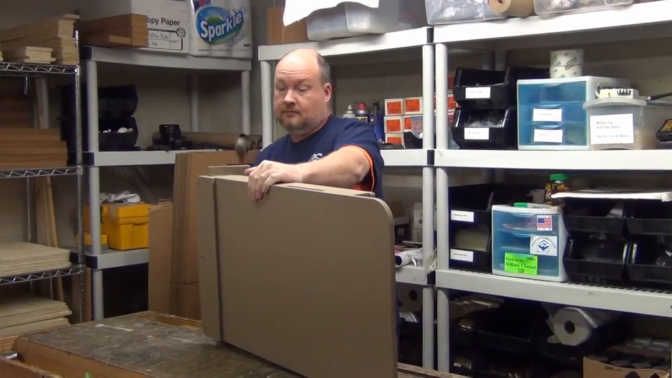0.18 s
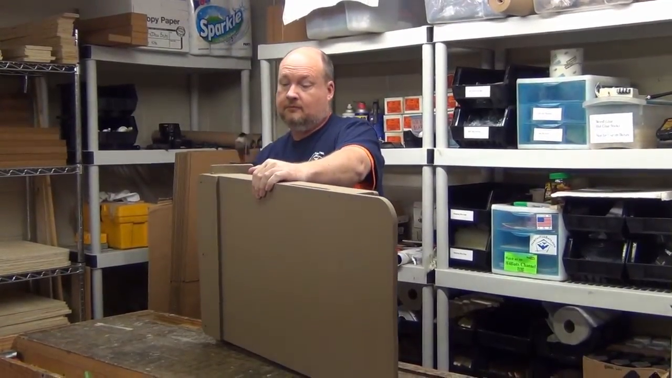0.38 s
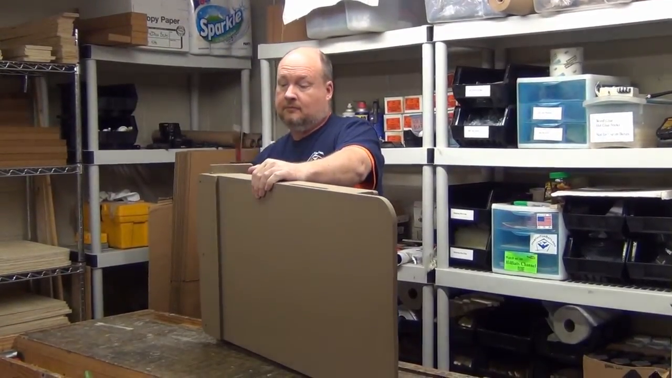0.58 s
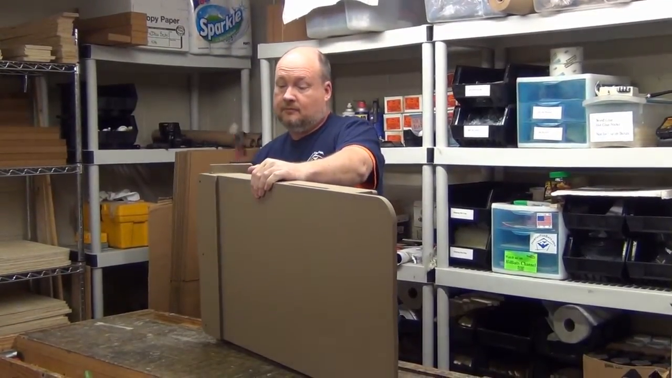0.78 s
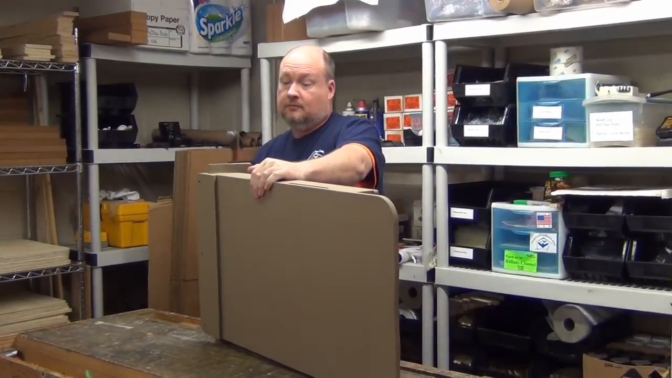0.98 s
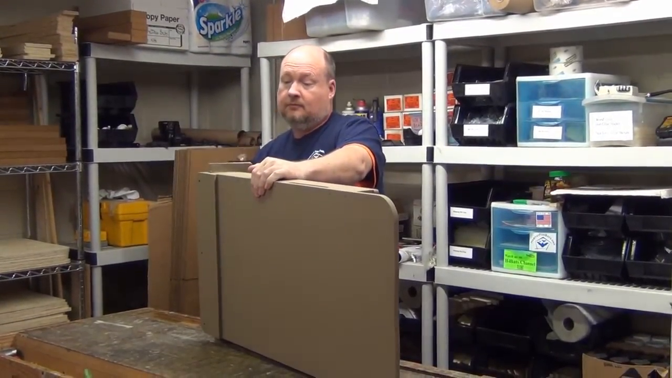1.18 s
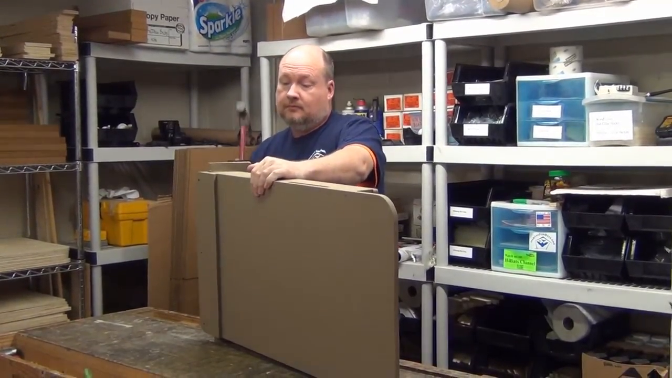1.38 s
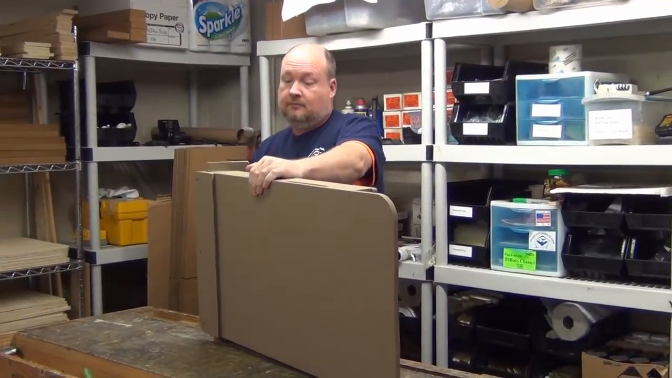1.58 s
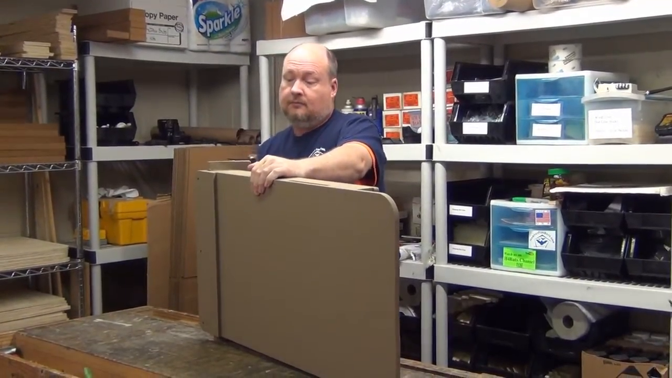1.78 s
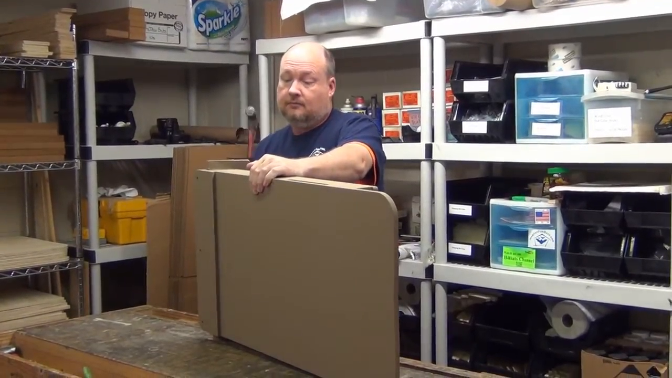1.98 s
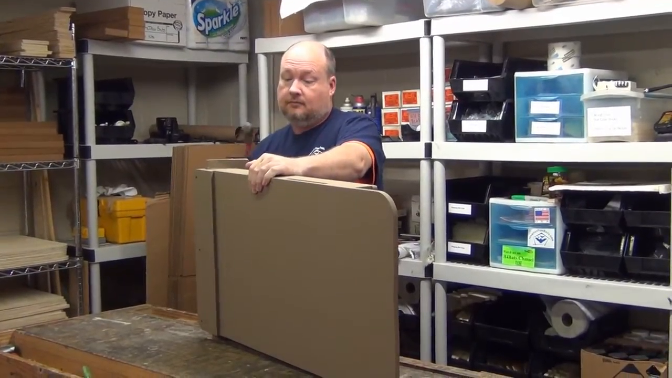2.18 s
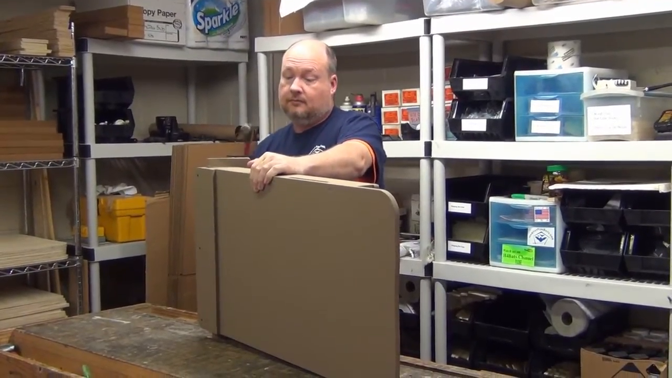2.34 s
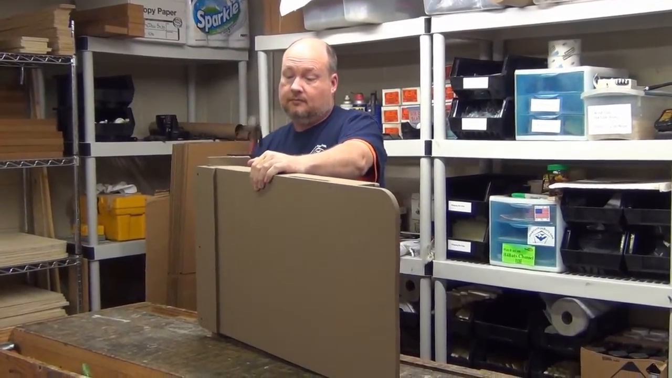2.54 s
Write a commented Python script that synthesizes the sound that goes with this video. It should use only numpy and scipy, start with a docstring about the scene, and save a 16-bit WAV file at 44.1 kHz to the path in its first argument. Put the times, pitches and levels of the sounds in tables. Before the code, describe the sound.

Four loud hollow thuds of a wooden box panel knocked on a workbench in a small workshop

```python
"""Wooden panel struck in a small workshop

A hollow panel is struck four times: noise echoes, dying sines and a short noise crack make each blow.
Soft rebounds of noise and wood tones follow, and loose things tick as tiny snaps of bright noise.
Behind them lie patchy room hiss, fuzzy machine hums and the camera's own faint whines.
The sound reaches two microphone ports, and the camera's limiter flattens each thud."""
import sys
import numpy as np
from scipy import signal
from scipy.fft import rfft, irfft
from scipy.io import wavfile
from scipy.ndimage import uniform_filter1d, minimum_filter1d

SR = 44100
rng = np.random.default_rng(int(sys.argv[2]) if len(sys.argv) > 2 else 0)


def master_out(mix):
    """Clip the mix to full scale and print it as 16-bit PCM to the path in sys.argv[1]."""
    frames = np.transpose(np.atleast_2d(mix))
    ceiling = np.clip(frames, -1, 1)
    pcm = np.round(ceiling * 32767).astype(np.int16)
    wavfile.write(sys.argv[1], SR, pcm)


def voltage_ratio(decibels):
    """Convert decibels (scalar or array-like) to amplitude ratios, 20 dB per decade."""
    exponent = np.asarray(decibels, float) / 20
    return 10 ** exponent


N = 112455

# Likeness of the two microphone ports: (frequency [Hz], correlation [-1 to 1])
PORT_LIKENESS = [(30, 0.42), (60, 1), (150, 0.92), (380, 0.97), (950, 0.98), (2380, 0.99), (5980, 0.89),
                 (15000, .85)]
# Balance of the two ports: (frequency [Hz], left minus right [dB])
PORT_BALANCE = [(30, 4), (70, -3), (180, -7.7), (550, -0.8), (1650, -1.6), (4970, -1), (15000, 0.3)]

# Colour of the room hiss: (frequency [Hz], relative level per Hz [dB])
HISS_COLOUR = [(25, -36), (45, -17), (65, 5), (100, 0), (176, 4.5), (357, -1.5), (783, -8), (1180, -5.5),
               (2510, -12.5), (4690, -14), (6150, -14), (7850, -11), (10000, -18), (14300, -24),
               (16300, -34)]
# Level of the room hiss before patchiness: (time [s], level [dB])
HISS_LEVEL = [(0, -58.5), (.2, -54.5), (.7, -58.5), (1.4, -57), (2.1, -57.5), (2.55, -52)]
# Fuzzy machine tones: (frequency [Hz], width [Hz], level [dB])
MACHINE_HUMS = [(171.7, 7.2, -64), (244, 7.4, -65), (306, 24, -68), (358.7, 26, -62), (500, 4.7, -70),
                (904, 23, -69.5), (1048, 16, -73)]
# Camera motor: (time [s], fundamental [Hz], pulse level before the harmonic levels [dB])
MOTOR_WHINE = [(1.22, 1590, -85), (1.28, 1587, -61), (1.55, 1585, -61), (1.9, 1553, -62), (2.15, 1553, -62),
               (2.55, 1560, -63)]
# Harmonics of the motor: (multiple of the fundamental [-], relative level [dB])
MOTOR_HARMONICS = [(1, -9), (2, -1.5), (3, 0)]

# Small ticks of loose things: (time [s], relative level [dB], centre frequency [Hz])
TICKS = [(0.0034, -33.5, 8000), (0.0458, -37, 7400), (0.1012, -40, 9250), (0.5364, -38, 8150),
         (0.576, -34, 8220), (1.86, -42, 7680), (1.882, -32.5, 9300), (1.925, -37, 7660),
         (1.939, -32.5, 7800), (2.0168, -37.5, 8400), (2.0414, -58, 8060), (2.0547, -50, 8180),
         (2.098, -50, 8240), (2.497, -24, 8170), (2.503, -24, 8460), (2.514, -28.5, 8150)]
# Soft rebounds: (time [s], relative level [dB], rise [s], brightness [dB per octave])
REBOUNDS = [(.511, -39, 0.011, -0.45), (0.822, -55, .004, 1.5), (1.075, -42, 0.0022, -1.5),
            (1.184, -38, 0.0066, 0.5), (1.35, -61.5, 0.0024, -0.5), (1.823, -42, 0.0063, 0),
            (1.995, -57, 0.0021, -2.5), (2.436, -45.5, 0.0082, 0.2)]
# Colour of the rebound scuff: (frequency [Hz], relative level per Hz [dB])
SCUFF_COLOUR = [(240, -22), (400, -6), (841, -8), (1210, -15), (1520, -9.5), (1970, -19), (2150, -25),
                (2580, -23.5), (5190, -21.5), (8060, -6), (15000, -54)]
# Higher wood tones: (frequency [Hz], relative level [dB], 60 dB decay before scaling [s])
WOOD_TONES = [(910, -6, .08), (1040, 3, .15), (1264, -9, .12), (1530, -5, .24), (1810, -6, .2),
              (2160, -7, .26), (2480, -9, .08), (2860, -9, .1), (3620, -12, .12)]

# Blows: (time [s], level before the limiter [dB], boom of the modes [dB],
#         boom tilt [dB per octave], brightness [dB per octave], decay factor [-])
BLOWS = [(0.2262, 7, -4.1, 1.2, -1.33, 1.12), (0.8951, 6, -2.6, -0.2, -0.95, 1.102),
         (1.5439, 6, -3.5, 0.5, 0.45, 1.022), (2.167, 5.5, -9.5, 1, -0.86, 1.033)]
# Modes of panel and bench: (frequency [Hz], relative level [dB], 60 dB decay before scaling [s])
BODY_MODES = [(104.44, -13.5, 0.252), (122.2, -5, 0.29), (141, -7, 0.29), (164.5, 1.43, 0.31),
              (206.6, -1, 0.32), (245.8, -6, 0.32), (267.6, 6, 0.22), (298.2, -4.5, 0.31),
              (331.6, -4.5, 0.25), (391, -0.5, .24), (428.6, -13, 0.26), (473, -18.5, 0.36),
              (530, -12, 0.26), (652.6, -10, 0.21)]
# Colour of the dense echoes: (frequency [Hz], relative level per Hz [dB])
THUD_COLOUR = [(24, -69), (40, -29), (140, 0.5), (269, -1), (503, -14), (680, -10), (770, -11),
               (1020, -14.5), (2260, -23.5), (5050, -29), (7930, -20.5), (13800, -51.5), (16000, -63)]
# Decay of the echoes: (frequency [Hz], 60 dB decay before scaling [s])
THUD_DECAY = [(60, 0.36), (150, 0.21), (400, 0.3), (1000, 0.25), (3000, 0.31), (8000, 0.28), (14000, 0.23)]
# Swell of the echoes: (frequency [Hz], rise time constant [s])
THUD_RISE = [(60, 0.076), (200, 0.0067), (500, 0.011), (1500, 0.001), (10000, 0.00067)]
# Echoes thinned where the modes carry the boom: (frequency [Hz], gain [dB])
ECHO_THINNING = [(90, 0), (140, -6), (350, -6), (520, 0)]
# Colour of the contact crack: (frequency [Hz], relative level per Hz [dB])
CRACK_COLOUR = [(150, -7), (400, -9.5), (900, 5), (1500, -8), (2500, -6), (4700, -22), (8200, -9.5),
                (10500, -17.5), (12700, -32), (16000, -37)]

PATCH_DB = -2  # spread of the hiss patches
LINE_HZ, LINE_DB = 15735, -71  # thin steady line-scan tone
WHINE_FIRST_S, WHINE_PER_S, WHINE_PULSE_S, WHINE_UNEVEN_DB = 1.289, 30, 0.0042, 2
TICK_DB, TICK_T60, TICK_WIDTH_HZ = -4, 0.009, 2500
TICK_TAIL_DB, TICK_TAIL_T60 = -21, 0.33
REBOUND_T60, REBOUND_RING_DB, SNAP_DB = 0.26, -4.5, 2.5
NOTE_DELAY_S, NOTE_HZ, NOTE_DB = 0.03, 850, 1.5  # late note, level relative to the wood tones
EARLY_S, EARLY_DB = 0.0058, -34  # lead of the thump through bench and floor over the air sound
ECHO_DB, BODY_DB, TONES_DB = -1.5, 1.5, -21.5
BODY_RISE_S, BODY_SPREAD_DB, TONE_SPREAD_DB = 0.0085, 2, 2
CRACK_DB, CRACK_T60, CRACK_RISE_S = 1.5, 0.014, 0.0015
CLUMP_DB, CLUMP_S = 0.5, 0.0037  # the echoes come in clumps
LATE_DB, LATE_T60 = -61.5, 0.73  # the slow end of the room
LIMIT_DB, RATIO, RECOVER_DB_PER_S, HOLD_S = -6, 11.6, 479, 0.007
EDGE_HZ = 16400  # upper edge of the recorded band


def evened(x):
    """Scale the whole array to an rms of 1."""
    return x / np.sqrt(np.mean(x ** 2) + 1e-20)


def read(points, hz):
    """Read a table of values along a logarithmic frequency axis."""
    f, value = np.transpose(points)
    return np.interp(np.log(hz + 1), np.log(f + 1), value)


def add(mix, s, sound):
    """Lay a sound into the mix at time s, cut at the end."""
    part = mix[:, round(s * SR):][:, :sound.shape[-1]]
    part += sound[..., :part.shape[1]]


def pair_noise(size, colour, tilt_db=0.):
    """Coloured noise at two microphone ports, partly alike in each band, rms 1."""
    hz = np.fft.rfftfreq(size, 1 / SR)
    common, apart = rfft(rng.standard_normal((2, size)))
    side = np.sqrt((1 - np.clip(read(PORT_LIKENESS, hz), 0, 1)) / 2)
    mid = np.sqrt(1 - side ** 2)
    lean = voltage_ratio(read(PORT_BALANCE, hz) / 2)
    left = (mid * common + side * apart) * lean
    right = (mid * common - side * apart) / lean
    tilt = tilt_db * np.log2((hz + 20) / 1000)
    return evened(irfft(np.array([left, right]) * voltage_ratio(read(colour, hz) + tilt), size))


def ring(modes, t, spread_db, slow, tilt_db=0):
    """Dying sines, struck a little differently each time and heard a little differently at each port."""
    hz, db, t60 = np.transpose(modes)[:, :, None]
    chance = rng.standard_normal((3, len(modes), 1))
    level_db = db + tilt_db * np.log2(hz / 230) + spread_db * chance[0]
    total = np.sqrt((voltage_ratio(db) ** 2).sum() / 2)
    size = voltage_ratio(level_db - 60 * t / (slow * t60)) / total
    turn = 2 * np.pi * hz * t + 0.88 * chance[1]
    ports = []
    for port in (1, -1):
        heard = (size * np.sin(turn + port * 0.072 * chance[2])).sum(0)
        ports.append(heard * voltage_ratio(-0.45 * port))
    return np.array(ports)


def fuzzy_tone(hz, width_hz, db):
    """A machine hum as noise in one narrow resonance, the same at both ports."""
    f = np.fft.rfftfreq(N, 1 / SR)
    resonance = 1 / (1 + ((f - hz) / width_hz * 2) ** 2)
    return voltage_ratio(db) * evened(irfft(rfft(rng.standard_normal(N)) * resonance, N))


def hiss():
    """Room hiss, slightly patchy in time and pitch, with fuzzy hums and one thin high tone."""
    t = np.arange(N) / SR
    _, _, z = signal.stft(pair_noise(N, HISS_COLOUR), nperseg=512)
    patches = uniform_filter1d(rng.standard_normal(z.shape[1:]), 6, 0)  # across frequency
    patches = evened(uniform_filter1d(patches, 10, 1))  # across time
    noise = signal.istft(z * voltage_ratio(PATCH_DB * patches), nperseg=512)[1][:, :N]
    hums = sum(fuzzy_tone(*row) for row in MACHINE_HUMS)
    line = voltage_ratio(LINE_DB) * np.sin(2 * np.pi * LINE_HZ * t)
    return noise * voltage_ratio(np.interp(t, *np.transpose(HISS_LEVEL))) + hums + line


def whine():
    """A faint small motor in the camera: gliding harmonics, pulsing once a picture."""
    t = np.arange(N) / SR
    s, hz, db = np.transpose(MOTOR_WHINE)
    turn = 2 * np.pi * np.cumsum(np.interp(t, s, hz)) / SR
    off = ((t - WHINE_FIRST_S) * WHINE_PER_S + 0.5) % 1 - 0.5  # pictures from the nearest pulse
    pulse = np.exp(-0.5 * (off / WHINE_PER_S / WHINE_PULSE_S) ** 2)
    uneven = WHINE_UNEVEN_DB * evened(uniform_filter1d(rng.standard_normal(N), 400))
    tone = sum(voltage_ratio(d) * np.sin(k * turn) for k, d in MOTOR_HARMONICS)
    return voltage_ratio(np.interp(t, s, db) + uneven) * pulse * tone


def tick(db, hz):
    """A tiny snap of bright noise with a little room behind it."""
    t = np.arange(SR // 4) / SR
    colour = [(1000, -50), (hz - TICK_WIDTH_HZ, -22), (hz, 0), (hz + TICK_WIDTH_HZ, -8), (16000, -30)]
    snap = np.minimum(t / 0.00046, 1) * voltage_ratio(-60 * t / TICK_T60)
    room = np.minimum(t / 0.0026, 1) * voltage_ratio(TICK_TAIL_DB - 60 * t / TICK_TAIL_T60)
    return voltage_ratio(db + TICK_DB) * pair_noise(len(t), colour) * (snap + room)


def rebound(db, rise_s, tilt_db):
    """A soft scuff of noise with the wood tones and one late dying note."""
    t = np.arange(SR // 2) / SR
    late = np.maximum(t - NOTE_DELAY_S, 0)
    note = voltage_ratio(NOTE_DB - 60 * late / 0.13) * np.minimum(late / 0.017, 1)
    note = note * np.sin(2 * np.pi * NOTE_HZ * late)
    decay = voltage_ratio(-60 * t / REBOUND_T60) + voltage_ratio(SNAP_DB - 60 * t / 0.02)  # scuff and short snap
    scuff = decay * pair_noise(len(t), SCUFF_COLOUR, tilt_db)
    # the brighter the scuff, the weaker the wood
    wood = voltage_ratio(REBOUND_RING_DB - 2.3 * tilt_db) * (ring(WOOD_TONES, t, TONE_SPREAD_DB, 0.71) + note)
    return voltage_ratio(db) * np.minimum(t / rise_s, 1) * (scuff + wood)


def early_thump(db):
    """The panel's modes through bench and floor, faint, swelling until the blow arrives."""
    t = np.arange(round(2 * EARLY_S * SR)) / SR
    swell = np.sin(np.pi * t / (2 * EARLY_S))
    return voltage_ratio(db + EARLY_DB) * swell * ring(BODY_MODES, t, 7.5, 1)


def room_echoes(t, tilt_db, slow):
    """Dense echoes as noise that rises and dies octave by octave, in clumps, with a slow room tail."""
    size = len(t)
    hz = np.fft.rfftfreq(size, 1 / SR)
    z = rfft(pair_noise(size, THUD_COLOUR, tilt_db)) * voltage_ratio(read(ECHO_THINNING, hz))
    octave = np.clip(np.log2(np.maximum(hz, 1) / 40), 0, 9)
    clumps = uniform_filter1d(rng.standard_normal((4, size)), round(CLUMP_S * SR), axis=1)
    clumps = evened(clumps)
    late = np.minimum(t / 0.036, 1) * voltage_ratio(LATE_DB - 60 * t / LATE_T60)
    thud = 0
    for k in range(10):
        share = np.clip(1 - abs(octave - k), 0, 1)  # overlapping octave bands
        centre = 40 * 2. ** k
        rise = (1 - np.exp(-t / read(THUD_RISE, centre))) ** 2
        shape = rise * voltage_ratio(-60 * t / (slow * read(THUD_DECAY, centre)))
        shape = shape * voltage_ratio(CLUMP_DB * clumps[k // 3])  # neighbouring bands share their clumps
        thud = thud + (shape + late) * irfft(z * share, size)
    return thud


def blow(db, boom_db, low_db, tilt_db, slow):
    """A blow on the panel: contact crack, ringing modes, higher wood tones and dense room echoes."""
    t = np.arange(SR) / SR
    thud = voltage_ratio(ECHO_DB) * room_echoes(t, tilt_db, slow)
    crack = voltage_ratio(CRACK_DB - 60 * t / CRACK_T60) * np.minimum(t / CRACK_RISE_S, 1)
    crack = crack * pair_noise(len(t), CRACK_COLOUR)
    body = voltage_ratio(BODY_DB + boom_db) * (1 - np.exp(-t / BODY_RISE_S)) ** 2
    body = body * ring(BODY_MODES, t, BODY_SPREAD_DB, slow, low_db)
    tones = voltage_ratio(TONES_DB) * np.minimum(t / 0.00067, 1) * ring(WOOD_TONES, t, TONE_SPREAD_DB, slow)
    return voltage_ratio(db) * (thud + crack + body + tones)


def scene():
    """The workshop at the two microphone ports, background first."""
    mix = hiss() + whine()
    for source, rows in ((tick, TICKS), (rebound, REBOUNDS), (blow, BLOWS)):
        for s, *row in rows:
            add(mix, s, source(*row))
    for s, db, *_ in BLOWS:
        add(mix, s - EARLY_S, early_thump(db))
    return mix


def limiter(x):
    """The camera's fast peak limiter holds each thud flat until it falls under the limit."""
    hold = round(HOLD_S * SR)
    peak = -minimum_filter1d(-abs(x).max(0), hold)  # sliding maximum of both channels
    peak_db = 20 * np.log10(peak + 1e-9)
    fall = np.arange(N) * RECOVER_DB_PER_S / SR
    held_db = np.maximum.accumulate(peak_db + fall) - fall  # recovers at a steady rate
    over_db = uniform_filter1d(np.maximum(held_db - LIMIT_DB, 0), hold)
    return x / voltage_ratio((1 - 1 / RATIO) * over_db)


def top_cut(x):
    """Nothing passes above the cut-off."""
    return signal.sosfilt(signal.butter(12, 16480, fs=SR, output="sos"), x)


def record(dry):
    """The camera's sound path: the band ends at its upper edge, then the limiter acts."""
    banded = signal.oaconvolve(dry, signal.firwin(255, EDGE_HZ, fs=SR)[None], "same")
    mix = limiter(banded)
    return top_cut(mix)


dry = scene()
out = record(dry)
master_out(out)
```